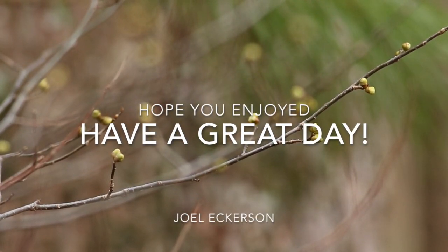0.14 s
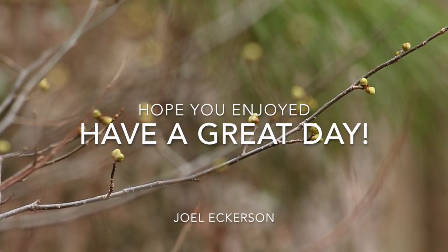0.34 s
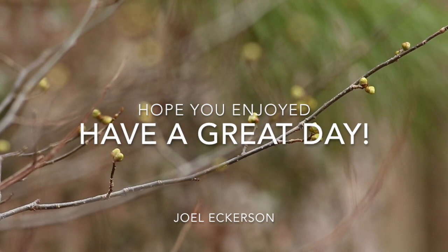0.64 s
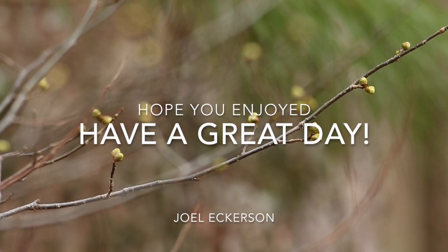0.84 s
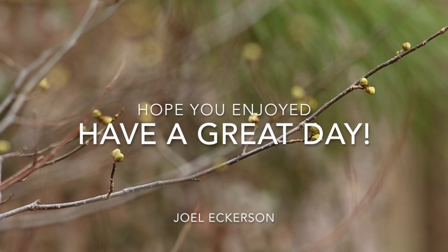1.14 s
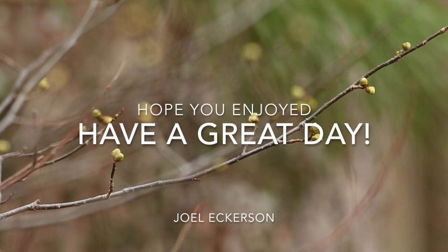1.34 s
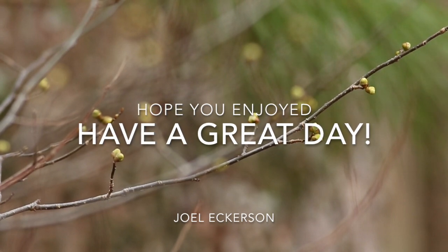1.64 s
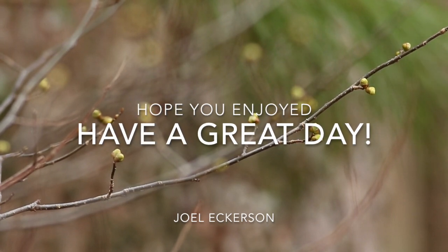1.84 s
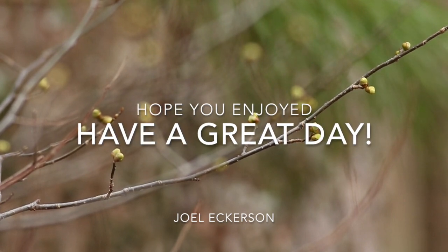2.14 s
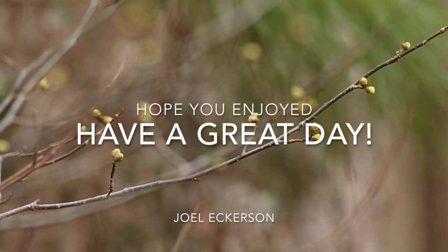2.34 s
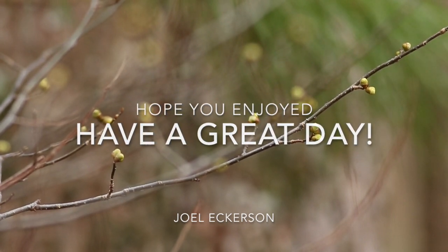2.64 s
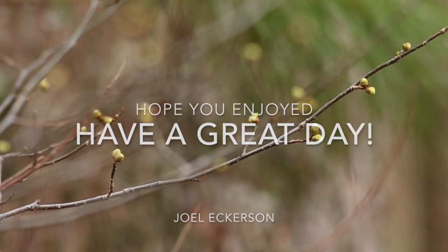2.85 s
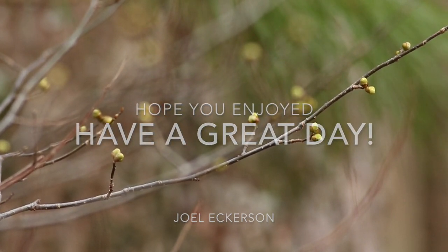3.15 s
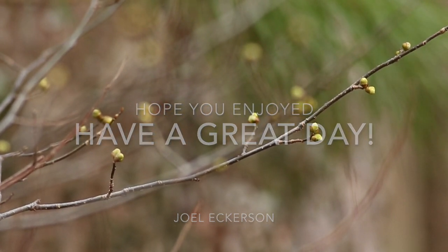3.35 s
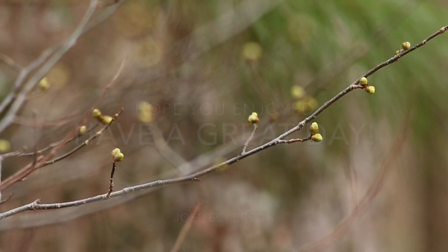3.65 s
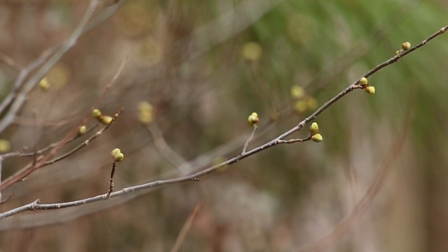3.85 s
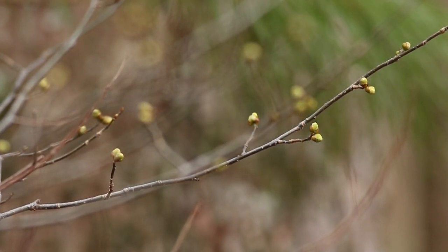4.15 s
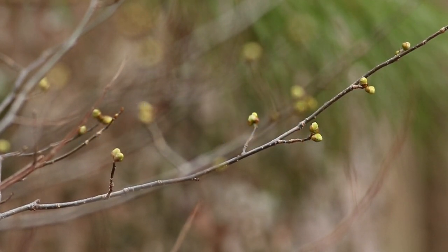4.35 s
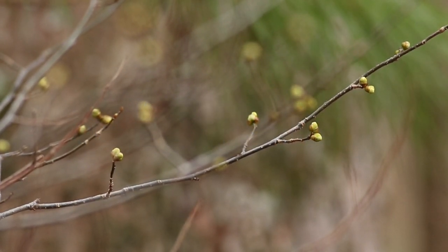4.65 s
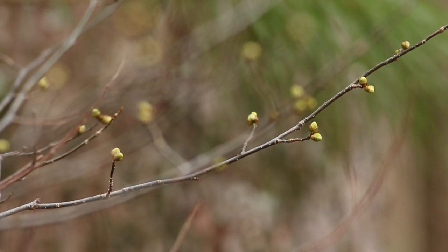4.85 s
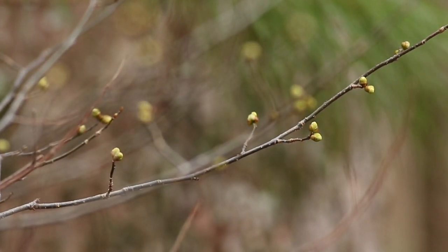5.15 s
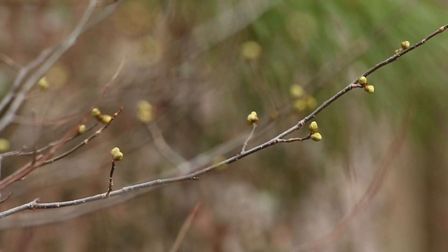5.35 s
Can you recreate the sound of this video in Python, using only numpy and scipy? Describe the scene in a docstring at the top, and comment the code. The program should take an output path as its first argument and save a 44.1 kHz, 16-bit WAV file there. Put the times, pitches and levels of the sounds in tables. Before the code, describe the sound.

A songbird whistles, buzzes, trills and swoops close by over a soft low owl trill, wheezy squeals and a shimmering distant chorus of small frogs.

```python
"""A near songbird at a spring woodland edge whistles, buzzes, trills and swoops: gliding, nearly pure tones.
Close by, another gives wheezy arching squeals and short peeps, partials weighted by its throat; both sit centred.
A small owl trills low and soft in swelling hoots; a katydid, stronger on the left, rasps by teeth ringing its wing.
Far birds whistle, tinkle and chip, and a far chorus of pulsed small callers shimmers over the noise of air in the
trees. Scatter from trunks and leaves reaches the two channels differently."""
import sys
import numpy as np
from scipy import signal
from scipy.fft import rfft, irfft
from scipy.io import wavfile
from scipy.ndimage import uniform_filter1d, map_coordinates

SR = 44100
rng = np.random.default_rng(int(sys.argv[2]) if len(sys.argv) > 2 else 0)


def wav_out(sig):
    """Save sig, one row per channel (or a flat mono array), as 16-bit PCM at SR to the path in sys.argv[1]."""
    wavfile.write(sys.argv[1], SR, np.round(np.clip(np.atleast_2d(sig).T, -1, 1) * 32767).astype(np.int16))


N = 242550
TIME, FREQS = np.arange(N) / SR, np.fft.rfftfreq(N, 1 / SR)  # seconds, Hz

# Air in the trees. Each row: frequency in Hz, density in dB per Hz.
AIR = [(22, -105), (50, -95), (80, -85.5), (115, -89), (250, -85.5), (750, -82), (1200, -85), (1600, -91.5),
       (2400, -92.5), (3400, -96), (7200, -102.5), (8700, -100), (10000, -105), (16000, -109)]
# Likeness of the air in the two channels. Each row: frequency in Hz, left-right correlation (0-1).
LIKENESS = [(60, 1), (130, 0.49), (290, 0.76), (640, 0.89), (1410, 0.64), (3100, 0.34), (6820, 0.8),
            (15000, 0.28)]
# Blended mass of the distant chorus. Each row: centre in Hz, width in Hz, peak density in dB per Hz.
CROWD = [(4350, 610, -86), (1898, 272, -84), (2775, 250, -92)]
# Far trillers before their echo. Each row: pitch in Hz, pulses per second, level in dB.
TRILLERS = [(4540, 56, -64), (4324, 54, -68.5), (4760, 86, -69.5), (1883, 17, -76)]
# Runs of the katydid's wing strokes. Each row: start in seconds, end in seconds, period in seconds.
STROKES = [(.014, .35, .211), (.442, .92, .191), (1.012, 1.77, .2168), (3.143, 5.43, .1696)]
# Resonance of the katydid's wing. Each row: frequency in Hz, relative gain in dB.
WING = [(7000, -50), (9800, -21.5), (11200, -3.5), (12200, 0.5), (13000, -5.5), (14000, 1.5), (14900, 2),
        (16000, 0)]
# Far falling whistles, before the far birds' common level.
# Each row: start in seconds, length in seconds, first pitch in Hz, last pitch in Hz,
# bend at the middle in Hz, level in dB, loudest point (0-1 of the length).
FAR_WHISTLES = [(0.191, 0.24, 3160, 3080, -2, -58, .5), (0.517, .11, 3120, 2770, 41, -54.5, 0.3),
                (1.028, 0.13, 3110, 3100, 5, -55, 0.3), (1.126, 0.038, 3030, 2850, 0, -46.5, 0.3),
                (1.18, .11, 2812, 2630, -61, -40, 0.28), (1.268, 0.13, 2664, 2414, -0.5, -42.5, 0.17),
                (1.389, 0.11, 2357, 2230, -45, -47, 0.2), (3.302, 0.28, 3014, 2347, 0.5, -42, 0.4),
                (3.55, 0.25, 2300, 2234, 1.5, -49, 0.03)]
# Runs of faint high notes. Each row: start in seconds, end in seconds, period in seconds.
TINKS = [(.39, .72, 0.24), (1.163, 2.18, .0972), (2.53, 2.97, 0.09), (3.738, 3.89, 0.11)]
# Short husky chips, before the far birds' common level. Each row: time in seconds, level in dB.
CHIPS = [(1.593, -39.5), (4.799, -40.5)]
# Wheezy squeals. Each row: time of the top in seconds, rise in seconds, fall in seconds, top pitch in Hz,
# effort in dB, lead-in in seconds, lead-in pitch in Hz.
SQUEALS = [(.6, .16, 0.18, 4320, 5, 0.018, 2780), (2.809, .137, 0.14, 4426, 4.3, .05, 3360),
           (5.311, .133, 0.17, 4385, 5, .028, 3180)]
# Peeps of the same bird. Each row: time of the top in seconds, length in seconds, top pitch in Hz, effort in dB.
PEEPS = [(0.874, 0.024, 3470, -5.5), (0.91, .021, 3830, -2), (.986, 0.084, 5300, 5),
         (1.061, 0.032, 5040, 2), (2.564, 0.023, 2900, -17), (3.066, 0.026, 3610, -2.5),
         (3.102, 0.013, 3920, -0.5), (3.174, 0.089, 5290, 4), (3.251, 0.042, 5120, 2)]
# What the throat lets out of the first partial. Each row: frequency in Hz, gain in dB.
THROAT = [(2600, -50), (3100, -51), (3650, -46), (4000, -39), (4400, -35.5), (5300, -31.5)]
# What it lets out of the higher partials. Each row: frequency in Hz, gain in dB.
OVERTONES = [(5200, -31), (6200, -46.5), (7300, -44), (8100, -49), (8800, -54.5), (10000, -61.5),
             (10700, -55.5), (13200, -63), (16000, -69)]
# The owl's tremolo hesitates midway, then hurries. Each row: time in seconds, seconds from one hoot to the next.
OWL_PACE = [(1.096, .0745), (1.615, .0736), (2.0111, .0654), (2.28, .1023), (2.6115, .0597), (3.31, .0669)]
# The owl's voice. Each row: time in seconds, pitch in Hz, level in dB, share of each beat that sounds.
OWL = [(1.095, 632, -44.5, 0.63), (1.22, 648, -40.5, 0.78), (1.5, 650.5, -40, .88),
       (2.08, 652, -39.1, 0.63), (2.38, 650, -39, 0.82), (2.65, 666.4, -38, .74),
       (3.235, 652.6, -39.5, 0.59), (3.3, 615, -47.5, .68)]
# Songbird's quick notes, and the clean undertones of its buzzes.
# Each row: start in seconds, length in seconds, first pitch in Hz, last pitch in Hz,
# bend at the middle in Hz, level in dB, loudest point (0-1 of the length).
NOTES = [(2.167, 0.018, 5130, 8200, -250, -26, 0.27), (2.183, .015, 5140, 8050, -100, -21, 0.27),
         (2.196, .015, 5400, 8060, -550, -19, 0.33), (2.222, 0.0084, 2420, 5860, -200, -26.5, .5),
         (2.2262, .005, 2570, 4200, 201, -20.5, 0.73), (2.238, .009, 4470, 2230, -150, -22, 0.27),
         (2.573, .1, 2410, 2740, 60, -31.5, .62), (2.659, 0.038, 2665, 3680, -110, -17.5, 0.6),
         (2.693, 0.039, 2630, 2870, 290, -27, 0.2), (2.711, .175, 2118, 1295, -91.5, -38.5, 0.1)]
# Overtones of its notes and buzzes. Each row: multiple of the pitch, relative level in dB.
PARTIALS = [(2, -38.5), (3, -37.5)]
# Its held whistle. Each row: time in seconds, pitch in Hz, level in dB.
HELD = [(2.229, 4068, -22), (2.283, 4017, -16), (2.419, 4101, -20), (2.447, 4079, -23.5),
        (2.457, 4046, -27.5)]
# Its falling whistle. Each row: time in seconds, pitch in Hz, level in dB.
FALLING = [(2.972, 4430, -38), (2.986, 4193, -26), (3.002, 4107, -17.5), (3.02, 3922, -14.5),
           (3.054, 3253, -20.5), (3.065, 3190, -29.5)]
# Its buzzes. Each row: start in seconds, length in seconds, first pitch in Hz, last pitch in Hz, bend in Hz,
# level in dB, loudest point (0-1), fade in dB, flutters per second, first swing in Hz, last swing in Hz,
# throb (+ loud at the crests, - in the troughs), pitch roughness (0-1).
BUZZES = [(2.572, 0.099, 3446, 3476, -55, -20, 0.84, 25.6, 191, 550, 210, 0.55, 0.015),
          (2.712, .158, 2560, 1854, -130, -38.5, 0.13, 16, 92, 358, 250, -0.3, 0.034)]
# Spacing of the trill. Each row: time in seconds, seconds from one down stroke to the next.
TRILL_PACE = [(3.0895, .0659), (3.66, .0687)]
# Strength of the trill. Each row: time in seconds, down stroke in dB, up stroke in dB,
# how much softer the down stroke opens in dB.
TRILL = [(3.09, -22.5, -30.5, 4), (3.16, -21.5, -26.5, 3), (3.32, -23, -26.7, 3), (3.49, -24, -29, 6),
         (3.56, -26, -31.5, 1), (3.627, -33.5, -35, -8)]
# The trill's down stroke. Each row: seconds from the syllable's time, pitch in Hz, relative level in dB.
DOWN = [(-.017, 8050, -28), (-.012, 7100, -15), (-.007, 6450, -11), (-.003, 5800, -7), (0, 4600, 0),
        (.002, 3750, -13), (.005, 3050, -28)]
# The trill's up stroke. Each row: seconds from the syllable's time, pitch in Hz, relative level in dB.
UP = [(-.03, 2280, -24), (-.02, 2480, -8), (-.012, 2700, 0), (-.004, 2920, -2), (0, 3020, -10),
      (.002, 3000, -28)]
# The swooping phrase. Each row: seconds from the syllable's time, pitch in Hz, relative level in dB.
SLUR = [(0, 6550, -26), (.012, 6500, -11), (.03, 6100, -2), (.058, 5550, -13), (.075, 7430, -7),
        (.092, 7020, 0), (.113, 5520, 0), (.136, 3580, -22), (.153, 3950, -14), (.171, 4020, -12.5),
        (.179, 3780, -27)]
# Its repeats. Each row: time in seconds, level in dB, pitch factor, how much softer the opening is in dB.
SLURS = [(4.712, -30.5, 1, 13.5), (4.955, -25.5, 1, 0), (5.185, -26.5, 0.99, -0.5),
         (5.42, -26.5, 0.99, -1.5)]


def amp(db):
    """Amplitude factor of a level in dB."""
    return 10 ** (np.asarray(db) / 20)


def unit(x):
    """The sound at an rms of 1."""
    return x / np.sqrt(np.mean(x ** 2) + 1e-20)


def read(points, hz):
    """A frequency curve read between its points on a log scale."""
    f, value = np.transpose(points)
    return np.interp(np.log(hz + 1), np.log(f + 1), value)


def add(mix, s, sound):
    """Lay a sound into the mix at a time in seconds, cut at the end."""
    start = max(round(s * SR), 0)
    part = mix[start:start + len(sound)]
    part += sound[:len(part)]


def at(rows, s):
    """The controls of a table at one moment."""
    times, *columns = np.transpose(rows)
    return [np.interp(s, times, column) for column in columns]


def follow(rows, size=60):
    """Times and smooth control curves through the rows of a table; size is the smoothing in samples."""
    s, *columns = np.transpose(rows)
    t = np.arange(s[0], s[-1] + 0.001, 1 / SR)
    return [t] + [uniform_filter1d(np.interp(t, s, column), size=size) for column in columns]


def beats(pace):
    """Times of a repeated call whose spacing follows a curve."""
    s, gap = np.transpose(pace)
    times = [s[0]]
    while times[-1] <= s[-1]:
        times.append(times[-1] + np.interp(times[-1], s, gap))
    return times[:-1]


def runs(rows):
    """Times of all beats in evenly paced runs."""
    return np.concatenate([np.arange(*row) for row in rows])


def wander(t, per_s):
    """Smooth chance of height about 1, with per_s random knots per unit of t."""
    knots = rng.standard_normal(4096)
    return map_coordinates(knots, [(t - t[0]) * per_s + 2], order=3, mode="wrap")


def angle(hz):
    """Phase in radians of a pitch curve."""
    return 2 * np.pi * np.cumsum(hz) / SR


def tone(hz, db):
    """A sine on a pitch curve at an rms level, with soft ends of about a millisecond."""
    ends = signal.windows.tukey(len(hz), 90 / len(hz))
    return np.sqrt(2) * amp(db) * np.sin(angle(hz)) * ends


def gate(t, attack_s, release_s):
    """Attack, hold, release."""
    return np.clip(np.minimum((t - t[0]) / attack_s, (t[-1] - t) / release_s), 0, 1)


def glide(length, first_hz, last_hz, bend_hz, db, loudest, fade_db, power):
    """Time, pitch and level of a note that slides along a bow, swells and fades."""
    t = TIME[:int(length * SR)]
    u = t / length
    loudest = np.clip(loudest, .05, .95)
    away = np.maximum((loudest - u) / loudest, (u - loudest) / (1 - loudest))
    hz = first_hz + (last_hz - first_hz) * u + bend_hz * (1 - (2 * u - 1) ** 2)
    return t, hz, db - fade_db * away ** power


def woods(x, t60, delay=0.012):
    """Scatter from trunks and leaves: a tail dying 60 dB in t60 seconds, different in each channel."""
    t = TIME[:SR]
    sparse = rng.standard_normal((2, SR)) * (rng.random((2, SR)) < .1)
    taps = sparse * amp(-60 * t / t60) * (t > delay)
    taps /= np.linalg.norm(taps, axis=1, keepdims=True)
    return signal.fftconvolve(x[None], taps, axes=1)[:, :N]


def air(swell_db=0.7):
    """Soft wash of the trees and the chorus too distant to tell apart: shaped noise that swells slightly."""
    power = amp(read(AIR, FREQS)) ** 2
    for hz, width, db in CROWD:
        power = power + amp(db) ** 2 * np.exp(-2 * ((FREQS - hz) / width) ** 2)
    left, other = rfft(rng.standard_normal((2, N)))
    same = read(LIKENESS, FREQS)
    right = same * left + np.sqrt(1 - same ** 2) * other
    wash = irfft(np.array([left, right]) * np.sqrt(power * SR / 2), N)
    return wash * amp(swell_db * wander(TIME, 3.723))


def chorus(sweep=0.17, echo_db=-6, octave_db=-18):
    """Far trillers: trains of short falling pulses with a faint octave, blurred by the trees."""
    out = np.zeros(N)
    for hz, rate, db in TRILLERS:
        unsteady_rate = rate * (1 + 0.013 * wander(TIME, 6))
        cycle = (np.cumsum(unsteady_rate) / SR + rng.random()) % 1
        phase = angle(hz * (1 + sweep * (.5 - cycle) + .014 * wander(TIME, 90)))
        pulses = (np.sin(phase) + amp(octave_db) * np.sin(2 * phase)) * np.sin(np.pi * cycle) ** 2
        out += amp(db + 3.4 * wander(TIME, 15)) * unit(pulses)
    return out + amp(echo_db) * woods(out, t60=0.18)


def katydid(stroke_s=.052, first_rate=980, last_rate=300, swell_db=7, ring_s=0.00044,
            squeak_hz=14500, squeak_db=10, left_db=-52.0, right_db=-63, echo_db=-60):
    """A scraper slows over a file as it presses harder; teeth ring the wing, a falling squeak ends the stroke."""
    teeth, squeaks = np.zeros(N), np.zeros(N)
    age = np.linspace(0, 1, int(stroke_s * SR))
    slip = np.linspace(0, 1, 200)
    press = amp(swell_db * (np.minimum(2 * age, 1) - 1.5))
    for s in runs(STROKES):
        # teeth per second
        rate = (first_rate + (last_rate - first_rate) * age) * (1 + 0.14 * wander(age, 30))
        strikes = np.diff(np.floor(np.cumsum(rate) / SR), prepend=0) * press
        add(teeth, s, strikes * rng.uniform(0.48, 1.0, len(age)))
        squeak = tone(squeak_hz * (1 - 0.377 * slip), squeak_db - 22 * slip ** 2)
        add(squeaks, s + stroke_s + .001, squeak)
    decay = np.exp(-TIME[:len(slip)] / ring_s)
    # no two teeth ring the wing quite alike
    rings = teeth + .17 * np.convolve(teeth, decay)[:N] * rng.standard_normal(N)
    # squeak_db is relative to the rung wing at unit level
    wing = unit(irfft(rfft(rings) * amp(read(WING, FREQS)), N)) + squeaks
    return amp([[left_db], [right_db]]) * wing + amp(echo_db) * woods(wing, t60=0.23, delay=.001)


def far_birds(tink_hz=5430, tink_db=-60, chip_hz=4000):
    """Falling whistles made ragged by distance, tiny high notes, and husky chips of two tones each."""
    out = np.zeros(N)
    for s, *note in FAR_WHISTLES:
        t, hz, db = glide(*note, fade_db=8.5, power=1.4)
        add(out, s, tone(hz * (1 + .009 * wander(t, 300)), db + 2.5 * wander(t, 90)))
    u = np.linspace(-1, 1, int(0.025 * SR))
    for s in runs(TINKS):
        size, slope = rng.standard_normal(2)
        pitch = tink_hz * (1 - 0.037 * u ** 2 - 0.045 * slope * u)
        add(out, s - .015, tone(pitch, tink_db + 1.5 * size - 12 * u ** 2))
    for s, db in CHIPS:
        pitch = chip_hz * (1 - 0.164 * u ** 2 + 0.079 * wander(TIME[:len(u)], 1500))
        level = db - 14 * u ** 2
        add(out, s - .015, tone(pitch, level) + tone(.72 * pitch, level - 8.5))
    return out


def throat(hz, effort_db, third_db=-7):
    """Three partials, each as loud as the throat's resonances let its pitch out."""
    first = tone(hz, effort_db + read(THROAT, hz))
    second = tone(2 * hz, effort_db + read(OVERTONES, 2 * hz))
    third = tone(3 * hz, effort_db + third_db + read(OVERTONES, 3 * hz))
    return first + second + third


def squealer(quiver_hz=82, swing_hz=68, falling_swing_hz=85, droop=0.39, slack_hz=2903, slack_db=-9,
             rise_power=4.3, fall_power=2.7, trail_falls=1.436, attack_s=.04, release_s=0.023):
    """Flat-topped arches of pressure whose pitch and effort sag together, quivering; peeps are clean arches."""
    out = np.zeros(N)
    for s, rise, fall, top_hz, top_db, lead, lead_hz in SQUEALS:
        t = np.arange(-rise - lead, trail_falls * fall, 1 / SR)
        # the weak lead-in holds its own pitch until the arch rises past it
        lead_slack = (top_hz - lead_hz) / (top_hz - slack_hz)
        rising = np.minimum(abs(t / rise) ** rise_power, lead_slack)
        slack = np.where(t < 0, rising, 1 - np.exp(-abs(t / fall) ** fall_power))
        quiver = np.sin(angle(quiver_hz * (1 + 0.15 * wander(t, 52.9))))
        # the quiver is deepest partway down the fall
        depth = swing_hz + falling_swing_hz * np.sin(np.pi * slack) * (t > 0)
        depth = depth * (1 + .3 * wander(t, 60))
        hz = top_hz + (slack_hz - top_hz) * slack + depth * quiver + 32 * wander(t, 170)
        effort_db = top_db + slack_db * slack + 0.9 * wander(t, 301.4)
        add(out, s + t[0], throat(hz, effort_db) * gate(t, attack_s, release_s))
    for s, length, top_hz, effort_db in PEEPS:
        u = np.linspace(-1, 1, int(length * SR))
        arch = .45 * u ** 2 + .55 * u ** 4
        add(out, s - length / 2, throat(top_hz * (1 - droop * arch), effort_db - 16 * arch ** 2))
    return out


def owl(arch=0.125, fall=0.043, octave_db=-11.0, scatter=0.0046, attack_share=0.39, release_share=0.45):
    """Each hoot swells, arches in pitch and drops away; its octave lingers through the drop."""
    out = np.zeros(N)
    for s in beats(OWL_PACE):
        hz, db, share = at(OWL, s)
        length = share * at(OWL_PACE, s)[0]
        u = np.linspace(-1, 1, int(length * SR))
        pitch = hz * (1.0117 + scatter * rng.standard_normal() - arch * u ** 2 - fall * u)
        swell = np.sin(np.pi / 2 * gate(u / 2, attack_share, release_share)) ** 2
        linger = signal.windows.tukey(len(u), .4) * amp(2 * u)
        add(out, s - length / 2, swell * tone(pitch, db) + linger * tone(2 * pitch, db + octave_db))
    return out


def whistle(t, hz, db, jitter=.003, flicker_db=.35, bright_db=0):
    """A nearly pure, slightly unsteady note; partials above half the sample rate are silenced."""
    hz = hz * (1 + jitter * wander(t, 500))
    db = db + flicker_db * wander(t, 190)
    out = tone(hz, db)
    for k, partial_db in PARTIALS:
        out = out + tone(k * hz, db + partial_db + bright_db) * (k * hz < SR / 2)
    return out


def breathy(count, lo_hz, hi_hz):
    """Hiss of air through the syrinx: band-passed noise at unit level."""
    band = signal.butter(2, [lo_hz, hi_hz], "band", fs=SR, output="sos")
    return unit(signal.sosfilt(band, rng.standard_normal(count)))


def held_notes(hiss_db=-45, scrape_s=2.212, scrape_length_s=.05, scrape_db=-42.5,
               attack_s=.002, release_s=0.00395):
    """Rising chips and quick slurs, a breathy scrape opening a held whistle, and a falling whistle."""
    out = np.zeros(N)
    for s, *note in NOTES:
        t, hz, db = glide(*note, fade_db=22.5, power=1.35)
        add(out, s, whistle(t, hz, db, jitter=0.0067, flicker_db=0.7, bright_db=4.5))
    swell = np.hanning(int(scrape_length_s * SR))
    add(out, scrape_s, amp(scrape_db) * swell * breathy(len(swell), lo_hz=2600, hi_hz=7000))
    for rows in (HELD, FALLING):
        t, hz, db = follow(rows)
        voice = whistle(t, hz, db, jitter=.0005, flicker_db=0.12)
        hiss = amp(db + hiss_db) * breathy(len(t), lo_hz=2600, hi_hz=4200)
        add(out, t[0], (voice + hiss) * gate(t, attack_s, release_s))
    return out


def buzzes(rasp_db=-27, unsteady=0.014):
    """A gliding note flutters fast; swing and throb settle as it goes on, and rasp rides on each throb."""
    out = np.zeros(N)
    for s, *note, rate, first_swing_hz, last_swing_hz, throb, rough in BUZZES:
        t, hz, db = glide(*note, power=2.73)
        swing = np.linspace(first_swing_hz, last_swing_hz, len(t))
        depth = np.linspace(throb, 0, len(t))
        flutter = np.cos(angle(rate * (1 + unsteady * wander(t, 136))))
        voice = whistle(t, hz + swing * flutter, db, jitter=rough, flicker_db=1.5)
        rasp = amp(db + rasp_db) * breathy(len(t), lo_hz=2800, hi_hz=7500)
        add(out, s, (voice + rasp) * (1 + depth * flutter))
    return out


def syllable(shape, s, level_db, pitch, soft_db, overtone_db, size=60):
    """Start and sound of one sweep; its octave stays at a more even level than the note itself."""
    t, hz, db = follow(shape, size=size)
    opening = np.clip(np.linspace(1, -1, len(t)), 0, 1)  # gone by the middle
    sung_hz = hz * pitch * (1 + 0.0069 * wander(t, 526))
    sung_db = db + level_db - soft_db * opening + wander(t, 252)
    octave = tone(2 * sung_hz, sung_db + overtone_db - .5 * db)
    return s + t[0], tone(sung_hz, sung_db) + octave


def trill_and_swoops(up_lag_s=.043, down_octave_db=-29, up_octave_db=-26, slur_octave_db=-45, up_soft_db=-2):
    """A slowing trill, each down stroke but the last answered by an up stroke; then a repeated swooping phrase."""
    out = np.zeros(N)
    times = beats(TRILL_PACE)
    for s in times:
        down_db, up_db, soft_db = at(TRILL, s)
        add(out, *syllable(DOWN, s, down_db, 1, soft_db, down_octave_db))
        if s < times[-1]:
            add(out, *syllable(UP, s + up_lag_s, up_db, 1, up_soft_db, up_octave_db))
    for row in SLURS:
        add(out, *syllable(SLUR, *row, slur_octave_db, size=300))
    return out


def scene(song_echo_db=-44, leaf_echo_db=-20, leaf_hz=6000, owl_echo_db=-22, far_db=-3, far_echo_db=-8.0):
    """Near birds and owl in the centre, far birds lowered, with their echoes, katydid, chorus and air."""
    song = trill_and_swoops() + held_notes()
    near = song + buzzes() + squealer()
    hoots, far = owl(), far_birds()
    # leaves throw back mostly the highest notes, and only briefly
    leaves = signal.sosfilt(signal.butter(8, leaf_hz, "high", fs=SR, output="sos"), song)
    echoes = amp(song_echo_db) * woods(near, t60=0.28)
    echoes += amp(leaf_echo_db) * woods(leaves, t60=0.078, delay=0.0069)
    echoes += amp(owl_echo_db) * woods(hoots, t60=0.55)
    echoes += amp(far_echo_db) * woods(far, t60=1.0)
    return near + hoots + amp(far_db) * far + echoes + katydid() + chorus() + air()


def record(dry, edge_hz=15880):
    """The band limit: a steep low-pass on both channels."""
    lowpass = signal.firwin(511, edge_hz, window=("kaiser", 9), fs=SR)
    return signal.oaconvolve(dry, lowpass[None], "same")


dry = scene()
out = record(dry)
wav_out(out)
```